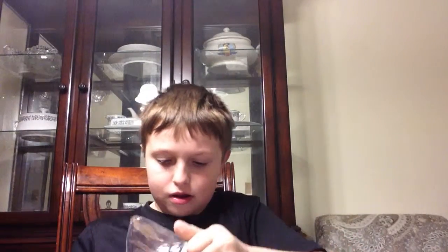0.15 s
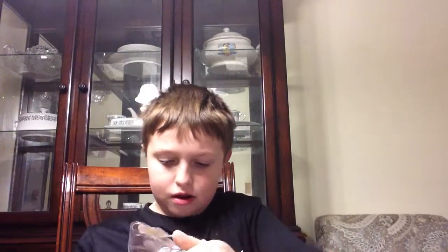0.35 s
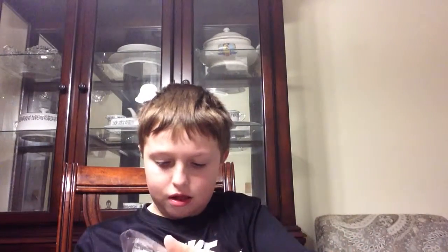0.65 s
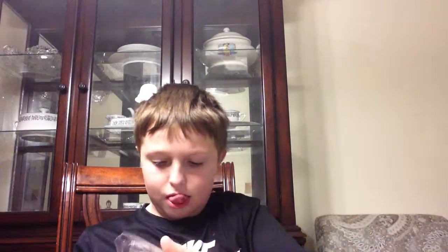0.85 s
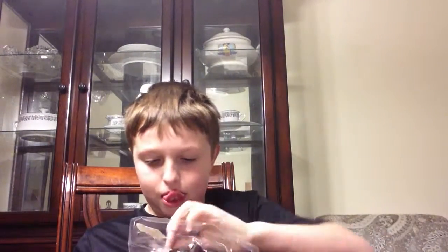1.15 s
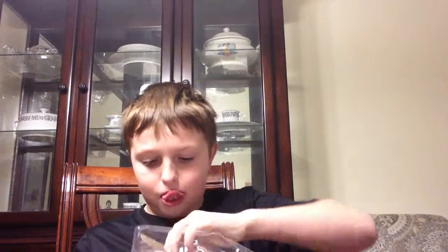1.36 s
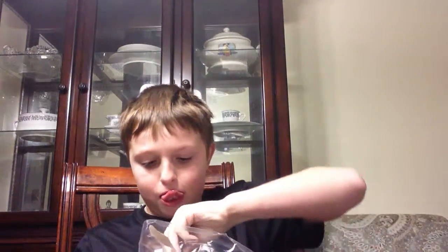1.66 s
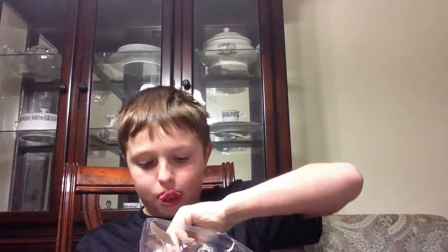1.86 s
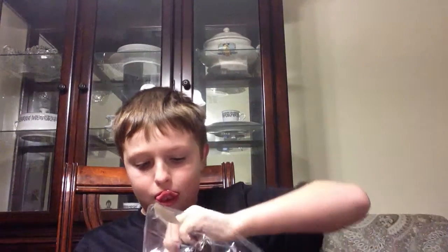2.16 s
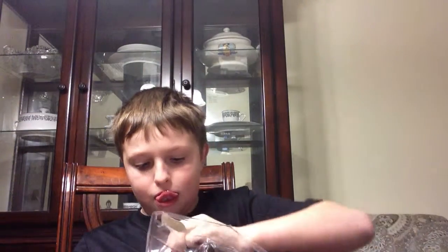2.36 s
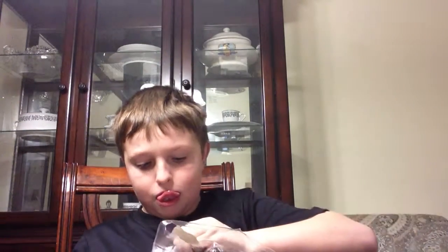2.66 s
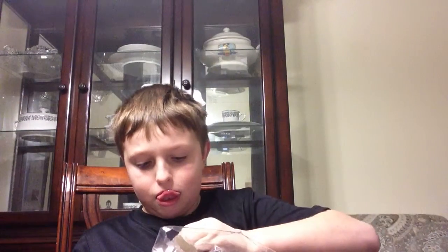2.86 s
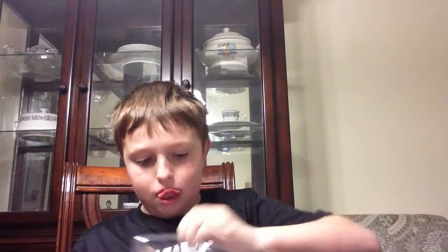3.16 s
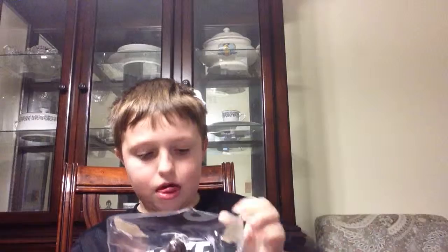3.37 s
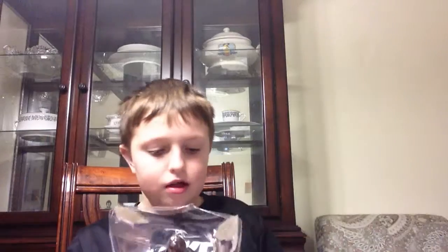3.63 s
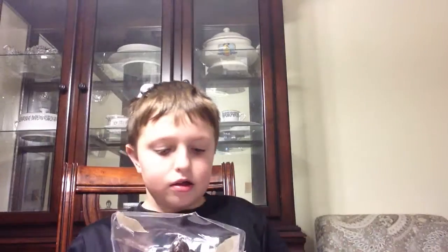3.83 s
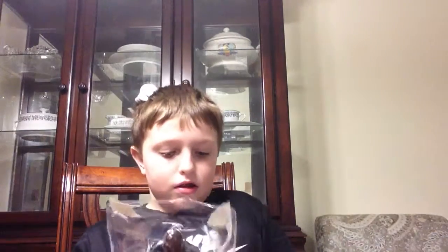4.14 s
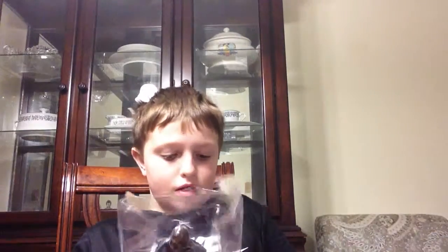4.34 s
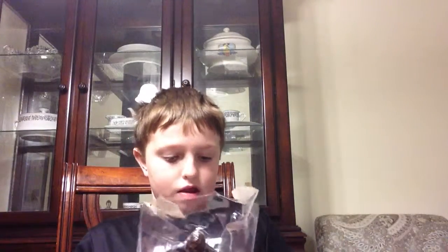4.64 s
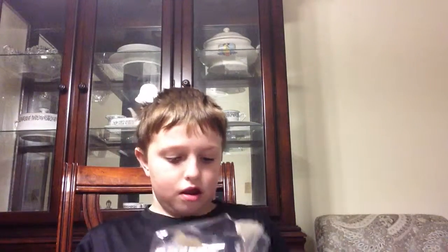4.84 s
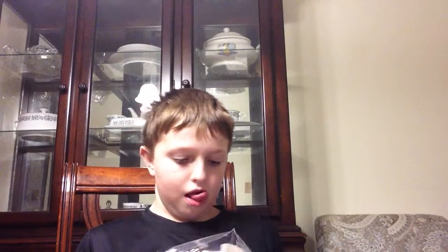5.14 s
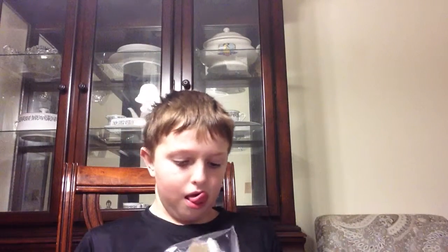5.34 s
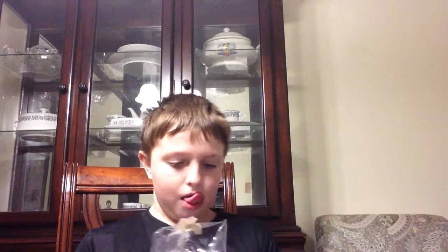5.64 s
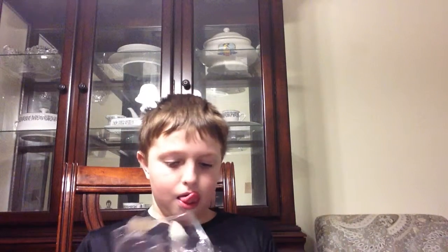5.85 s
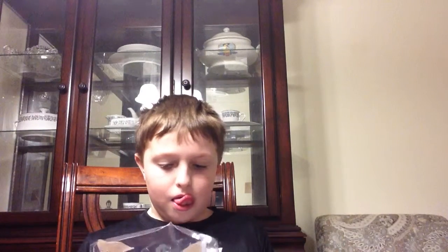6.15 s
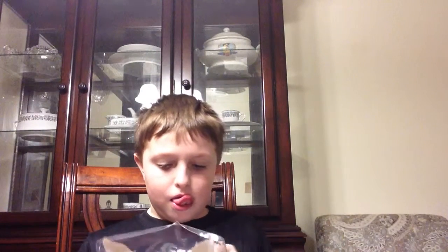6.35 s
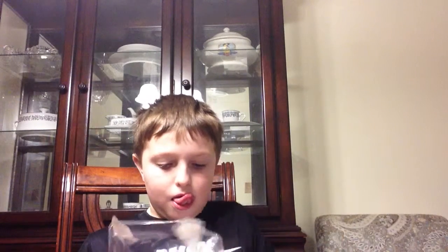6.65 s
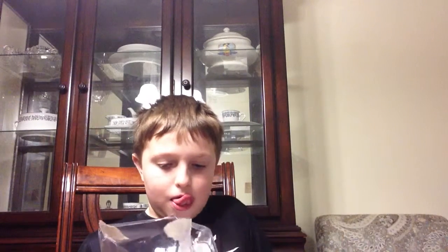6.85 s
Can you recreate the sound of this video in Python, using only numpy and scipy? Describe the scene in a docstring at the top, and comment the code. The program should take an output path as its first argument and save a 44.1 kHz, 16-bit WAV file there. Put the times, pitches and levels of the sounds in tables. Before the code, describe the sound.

Thin hard plastic packaging is worked by hand indoors. Low panel pops and bright creasing ticks cluster for a second and a half, then thin out to single clicks over soft room noise. A loud crackling burst follows, with rubbing and dull finger bumps, and stays busy. Near the end a deep pocket thumps hollowly, high squeaks slip by, and snaps continue. Close, thin-bassed pickup with short room reverberation.

```python
"""Hands work a toy figure out of a clear plastic blister tray, near a small microphone in a dining room, for 7 s.
Thin squeaks glide by under the first snaps: wide panels of the shell pop low, tight creases tick high.
From 1.5 s it is mostly faint, with single pops; a dense flurry of snaps opens at 4.26 s, loudest at 4.36 s.
Very high squeaks sound from 6.05 s, the deep pocket drums at 6.19 s, and snaps go on to the end. Crackle and
rubbing (shaped noise) follow the flexing, fingers bump the tray; room ring and steady noise lie beneath."""
import sys
import numpy as np
from scipy import signal
from scipy.fft import rfft, irfft
from scipy.io import wavfile
from scipy.ndimage import uniform_filter1d

SR = 44100
rng = np.random.default_rng(int(sys.argv[2]) if len(sys.argv) > 2 else 0)


def unload_audio(sound):
    """Save the sound as a 16-bit wav file, at the path given as the first command line argument."""
    columns = np.transpose(np.atleast_2d(sound))
    # keep every value between -1 and 1, then stretch to whole-number steps
    steps = np.round(np.clip(columns, -1, 1) * 32767)
    wavfile.write(sys.argv[1], SR, steps.astype(np.int16))


N = 308700

# buckles of the shell: (t/s, level/dB before the layer gain, panel pitch f/Hz,
# fall above that pitch/dB per octave, length/ms)
SHELL_SNAPS = [(.1,-37.5,810,1,3.2), (0.1158,-25.5,3240,3,1.3), (.163,-20.5,2420,7,3),
               (.227,-35.5,13100,11,1.2), (0.2778,-34,1420,-0.5,1.9), (0.3195,-33,1350,5,3.3),
               (.405,-26.5,566,2,5.2), (0.4163,-19.5,1110,3.5,2.1), (0.4491,-15.5,3720,6.5,3.3),
               (0.4687,-22.5,615,4.5,2.4), (0.487,-21.5,774,5.5,5.4), (.54,-24,630,1,5.5),
               (0.59,-23.5,1210,4,7.7), (0.6466,-24.5,1580,9,5), (0.708,-31.5,1110,5.5,6.6),
               (0.7384,-24.5,1700,0.5,3.4), (0.743,-21,4400,-1,4.5), (0.8477,-43,10000,-7.5,5),
               (0.9391,-30,1340,28,2.1), (0.9611,-30,1700,12,1.1), (0.974,-25,2640,19,3.2),
               (.9937,-22,2620,-4,3.3), (0.9989,-20.5,814,7.5,0.99), (1.0087,-24.5,1900,12,1.1),
               (1.0137,-27,1500,4,2.8), (1.041,-24,4050,6,3.7), (1.0664,-29,900,4,5.6),
               (1.185,-26,2900,11,3.3), (1.2381,-32,640,9,9.4), (1.3123,-46,10700,6,1.4),
               (1.3486,-28.5,2600,2.5,5.5), (1.3849,-16.5,1270,2,5.4), (1.557,-33,11200,6,2.6),
               (1.65,-52,10300,8,2), (1.7,-47.5,600,1,1.2), (1.827,-48,1020,9,2.9), (1.8556,-46,980,12,4.7),
               (1.8812,-43.5,730,7,4.1), (1.969,-31.5,2780,14.5,3), (2.006,-37.5,12500,3,2.7),
               (2.024,-48,13000,0,2.3), (2.046,-16.5,680,6,3.1), (2.046,-22,3500,13.5,4.7),
               (2.1935,-50,12000,3,1.6), (2.183,-39.5,1000,4,3.7), (2.2065,-33,600,5.5,5),
               (2.2298,-41.5,4500,-6,3), (2.332,-40.5,11500,6,3), (2.3735,-30.5,900,-1.5,3.1),
               (2.6946,-45,6000,-7,0.85), (2.74,-41.5,497,13,4.1), (2.8044,-34.5,6500,0,0.96),
               (2.832,-32,1500,-4,4.3), (3.0245,-19,864,10.5,11), (3.062,-31,4350,5.5,2.1),
               (3.1348,-42,13000,0,2), (3.1446,-40,9600,8,2), (3.16,-36.5,525,7,3.9),
               (3.19,-40,10800,5,1.9), (3.213,-34,656,1,5.8), (3.5476,-32,4000,-1,2.5),
               (3.5754,-33,13000,5,3.3), (3.587,-32,1000,-1,0.7), (3.6067,-36,700,4,9.1),
               (3.6305,-35.5,1200,6,1.2), (3.6895,-38.5,744,1,4.7), (3.8411,-29.5,730,8,3.9),
               (3.97,-39.5,1340,17,2.7), (4.0686,-44.5,700,-0.5,4.2), (4.1229,-30.5,690,7,6),
               (4.256,-44,2000,11,3), (4.2604,-17,2220,10.5,5.1), (4.3078,-25,640,5.5,2.1),
               (4.3553,-19.5,2900,12,8.6), (4.3611,-9.5,2070,4.5,6.3), (4.3866,-17.5,1450,15,2.3),
               (4.3972,-17.5,510,2,2.6), (4.4312,-20.5,1200,2.5,2.8), (4.4525,-19.5,2000,-.5,2.6),
               (4.4646,-21,795,0.5,2.4), (4.4736,-24,2080,0,1.9), (4.538,-20,1800,1,3.1),
               (4.5555,-20,1150,3.5,4), (4.6006,-21,736,0,4.2), (4.628,-17.5,2150,-1.5,6.4),
               (4.6332,-14,1130,2,1.8), (4.688,-23.5,900,5.5,4), (4.694,-27.5,11700,-3,0.91),
               (4.7233,-27,525,5,3.5), (4.759,-24,930,4,2.4), (4.812,-26,4000,10,3),
               (4.836,-30.5,1500,-1.5,4.3), (4.89,-29,1800,2,2.9), (4.9037,-26.5,1180,15,5.6),
               (4.9252,-27.5,3300,8,3.6), (4.9659,-14,1920,8,3.4), (5.047,-28.5,1080,13,3.2),
               (5.095,-27.5,1850,1.5,2.1), (5.11,-15,4000,0,4.9), (5.122,-15.5,2520,3,2.7),
               (5.2,-25.5,930,4.5,7.6), (5.2417,-26.5,1680,1.5,3.8), (5.2748,-20,9100,11,0.7),
               (5.314,-30,7550,13,7.1), (5.325,-27.5,1000,-3,4), (5.3754,-24.5,3440,11,.7),
               (5.407,-20,1340,5,5.1), (5.4159,-12,2460,6.5,4.2), (5.4612,-30,700,1,4.5),
               (5.6138,-20.5,1780,-1.5,2.5), (5.6495,-22.5,2020,0.5,1.6), (5.6817,-27.5,2500,4,1),
               (5.7607,-25,1550,6,9.6), (5.7803,-29,1050,7.5,2.1), (5.8219,-30,464,3.5,1.9),
               (5.841,-30.5,10000,-8,17), (5.8674,-24,940,0,4.2), (5.934,-22,905,-2.5,4.1),
               (5.989,-27,5500,-2,1.6), (5.9985,-32.5,1810,11,3.1), (6.0207,-20.5,2170,0,6),
               (6.04,-18.5,7100,5,6), (6.1374,-35.5,550,4,1.5), (6.1896,-10,625,4,1.3),
               (6.5068,-34.5,7500,1,3.3), (6.585,-24,2300,3.5,4.4), (6.621,-25.5,1500,6,2.7),
               (6.6435,-14,1780,8,4.9), (6.6689,-25,1200,-0.5,3), (6.6862,-16.5,2450,4,1.6),
               (6.7153,-25.5,1220,4,2.5), (6.8702,-30,2030,16,4.9), (6.8902,-14.5,2000,6.5,5.9),
               (6.9646,-21,3300,13,2.4), (6.974,-23,1270,2,2.2)]
# colour that the shell gives every snap: (f/Hz, level/dB)
SHELL_COLOUR = [(30, -24), (90, -53), (150, -7), (240, -3.5), (460, 2.5), (730, 5.5), (1100, 3),
                (2200, 0.5), (4500, -3), (9000, -4.5), (15000, -5)]
# colour of the fine crackle and rubbing, relative: (f/Hz, level/dB per Hz)
CRACKLE_COLOUR = [(60, -4), (160, 1.5), (350, 7.5), (800, -1), (1600, 4), (3000, -2), (6000, -10),
                  (10000, -12.5), (15000, -12)]
# hands squeeze or pull the tray: (start t/s, length/s, effort level/dB, extra treble level/dB)
HAND_SQUEEZES = [(0, .03, -34.5, 2), (0.083, .08, -36, 1), (0.275, 0.094, -43.5, 8), (.41, 0.16, -40.5, 6),
                 (.56, 0.26, -41.5, -3.5), (0.935, .12, -33, 6.5), (1.136, 0.064, -40.5, -17),
                 (1.349, 0.035, -38.5, 3), (1.78, .2, -57.5, -4), (2.692, 0.056, -60, 19.5),
                 (3.122, 0.044, -50.5, 7), (3.556, 0.051, -38, 8.5), (3.94, 0.22, -63, -2),
                 (4.354, 0.088, -37, -4), (4.628, 0.2, -33, 3), (4.89, 0.14, -42.5, -3),
                 (5.032, 0.073, -44.5, 11), (5.102, 0.25, -43, 15), (5.406, .12, -29.5, 1.5),
                 (5.599, 0.08, -39, 8), (5.751, 0.03, -30.5, 0), (5.851, 0.1, -46, 28),
                 (5.992, .07, -41, 17.5), (6.174, 0.15, -55, 4), (6.538, .08, -44, 9),
                 (6.637, 0.088, -24, -3), (6.885, 0.13, -32, 6.5)]
# plastic sticks and slips on plastic: (start t/s, length/s, pitch f/Hz, glide over the length/Hz, start level/dB)
STICK_SLIPS = [(0.029, 0.087, 958, -30, -44), (.29, 0.38, 533, -31.5, -50), (.6, 0.23, 907, -125, -40),
               (6.055, 0.098, 8920, 50, -35.5), (6.517, 0.17, 8770, -96, -36),
               (6.605, 0.042, 9300, 50, -33)]
# fingers bump the whole tray: (t/s, level/dB before doubling, pitch f/Hz)
FINGER_BUMPS = [(1.047, -34.5, 284), (2.212, -39, 304), (2.74, -40.5, 234), (3.033, -35, 258),
                (4.259, -28, 257), (4.368, -23.5, 245), (5.823, -28, 332), (6.202, -31, 342)]
# colour of the drumming pocket, relative: (f/Hz, level/dB per Hz)
POCKET_COLOUR = [(100, -50), (220, -16.5), (320, 1), (480, -0.5), (700, 3.5), (790, -4.5), (950, -36),
                 (3000, -42), (15000, -70)]
# lingering tones of the hollow tray, relative: (f/Hz, level/dB, t60/s)
HOLLOW_TONES = [(364, 3.5, .24), (521, 1, .3), (688, -5, .25), (1264, -7, .3), (1388, -13, .2)]
# room decay: (f/Hz, t60/s)
ROOM_DECAY = [(200, 0.59), (530, 0.44), (1400, 0.45), (3700, 0.44), (9700, 0.38), (15000, 0.23)]
# colour of the steady room noise, relative: (f/Hz, level/dB per Hz)
AIR_COLOUR = [(25, 22), (60, -27), (105, -6), (140, -2.5), (180, 1), (240, 1), (380, 1), (700, -4.5),
              (2400, -18.5), (8000, -20.5), (15000, -24)]

EDGE_HZ = 15550  # top of the audible band, for the snaps and the microphone
TAPS = 2048  # samples in one snap or bump
BINS = np.fft.rfftfreq(TAPS, 1 / SR)  # Hz
FOLD_HZ = np.geomspace(800, 16000, 22)  # where the resonances of a fold may lie
# a panel radiates poorly below its pitch, the more so the steeper its top falls
BASS_DB_PER_OCTAVE, NARROWING = 6.5, 0.1
# a squeeze builds, then dies away; merely holding the tray rustles a little
GRIP_S, RELAX_S, HOLD_DB = 0.005, 0.025, -61
TREBLE_HZ = 4000  # split between body and treble of the crackle
SQUEAK_RISE_S, SQUEAK_FADE_DB = 0.025, -10.5
POCKET_S, POCKET_DB, POCKET_RISE_S, POCKET_T60_S = 6.19, -21.5, 0.04, 0.57
AIR_DB = -50.5


def snaps(direct_db=1.68, peak_db=3.5, lag_s=0.0015):
    """Distinct buckles: a jagged burst to the microphone, and the sound sent in all other directions."""
    direct, scattered = np.zeros((2, N))
    for s, db, pitch_hz, fall, length_ms in SHELL_SNAPS:
        waves = burst(length_ms, ripple_db=3.0)
        below = BASS_DB_PER_OCTAVE + NARROWING * fall
        towards_mic = snap(pitch_hz, below, fall, waves, peak_db)
        add(direct, s, amp(db + direct_db) * towards_mic)
        # over all directions the ripples of the spectrum average out
        all_round = snap(pitch_hz, below, fall, 1, peak_db=0)
        add(scattered, s + lag_s, amp(db) * all_round)
    return direct, scattered


def snap(pitch_hz, below, above, waves, peak_db=5, peak_octaves=0.25):
    """Colours bending waves by the panel that buckles; slopes in dB/octave, energy that of rms 1 over 5 ms."""
    octaves = np.log2(np.maximum(BINS, 100) / pitch_hz)
    panel_db = below * np.minimum(octaves, 0) - above * np.maximum(octaves, 0)
    panel_db += peak_db * np.exp(-(octaves / peak_octaves) ** 2)
    top_cut = 1 + (BINS / EDGE_HZ) ** 30
    gain = amp(panel_db + read(SHELL_COLOUR, BINS)) / top_cut
    wave = irfft(waves * causal(gain))
    return wave * np.sqrt(0.005 * SR / np.sum(wave ** 2))


def burst(length_ms, rise_ms=0.065, linger_db=-21, linger_ms=25.0, grit=0.49, ripple_db=5.0):
    """Spectrum of one buckle: bending waves cross the panel for a few ms; flat overall, jagged in detail."""
    ms = np.arange(TAPS) * 1000 / SR
    past = np.maximum(ms - length_ms, 0)
    body = np.exp(-(ms / length_ms) ** 3)
    linger = amp(linger_db) * np.exp(-past / linger_ms)
    shape = (1 - np.exp(-ms / rise_ms)) * (body + linger)
    gritty = rng.standard_normal(TAPS) * np.exp(grit * rng.standard_normal(TAPS))
    z = rfft(shape * gritty)
    # a running mean of the power, wider towards the treble, levels the broad slope
    k = np.arange(len(z))
    reach = 9 + k // 2
    lo, hi = np.maximum(k - reach, 0), np.minimum(k + reach, len(z))
    total = np.r_[0, np.cumsum(abs(z) ** 2)]
    mean_power = (total[hi] - total[lo]) / (hi - lo)
    # every fold has its own few broad resonances
    ripple = np.interp(BINS, FOLD_HZ, rng.standard_normal(len(FOLD_HZ)))
    return z / np.sqrt(mean_power) * causal(amp(ripple_db * ripple))


def crackle(crackle_db=-3.5, rub_db=-11, per_s=120, spread_db=5.0, count=24):
    """Tiny creases give way at random and fingers slide, both as strongly as the tray is flexed."""
    happens = rng.random(N) < per_s / SR
    sizes = amp(spread_db * np.minimum(rng.exponential(1, N), 3)) * happens
    crease = rng.integers(0, count, N)
    ticks = np.zeros(N)
    for k, pitch_hz in enumerate(np.geomspace(600, 13000, count)):
        waves = burst(rng.uniform(3.3, 5.1))
        tick = snap(pitch_hz, 3.7, 2.67, waves) * np.sqrt(pitch_hz)
        ticks += signal.oaconvolve(sizes * (crease == k), tick)[:N]
    rub = amp(rub_db) * tint(rng.standard_normal(N), CRACKLE_COLOUR)
    grain = amp(crackle_db) * tint(ticks, CRACKLE_COLOUR) + rub
    low = signal.sosfiltfilt(signal.butter(2, TREBLE_HZ, fs=SR, output="sos"), grain)
    body, treble = flexing()
    return body * low + treble * (grain - low)


def flexing():
    """How hard the tray is worked, for body and treble: each squeeze builds, holds and relaxes."""
    t = np.arange(N) / SR
    body, treble = np.full((2, N), amp(HOLD_DB))
    for s, length, db, treble_db in HAND_SQUEEZES:
        build = np.clip((t - s) / GRIP_S, 0, 1)
        relax = np.exp(-np.maximum(t - s - length, 0) / RELAX_S)
        effort = amp(db) * build * relax
        body = body + effort
        treble = treble + effort * amp(treble_db)
    return body, treble


def squeaks(waver=0.0038, octave_db=-12, flutter_db=3.0):
    """Stick-slip whistles, thin and unsteady, with a weak octave: each swells, glides and fades."""
    out = np.zeros(N)
    for s, length, hz, glide_hz, db in STICK_SLIPS:
        t = np.arange(0, length, 1 / SR)
        drift = unit(uniform_filter1d(rng.standard_normal(N), size=60))[:len(t)]
        pitch = (hz + glide_hz * t / length) * (1 + waver * drift)
        phase = 2 * np.pi * np.cumsum(pitch) / SR
        tone = np.sin(phase) + amp(octave_db) * np.sin(2 * phase)
        tone = tone * signal.windows.tukey(len(t), 0.1)
        grip = unit(uniform_filter1d(rng.standard_normal(N), size=700))[:len(t)]
        swell = np.minimum(t / SQUEAK_RISE_S, 1) * amp(db + SQUEAK_FADE_DB * t / length)
        add(out, s, swell * unit(tone * amp(flutter_db * grip)))
    return out


def bumps(decay_s=0.0068):
    """Soft blows: a few cycles of the whole tray swinging in the hand."""
    out, t = np.zeros(N), np.arange(TAPS) / SR
    for s, db, hz in FINGER_BUMPS:
        envelope = (1 - np.exp(-t * hz * 2)) * np.exp(-t / decay_s)
        add(out, s, 2 * amp(db) * envelope * np.sin(2 * np.pi * hz * t))
    return out


def pocket():
    """The deep pocket pops out and drums on: coloured noise as many close low modes that swell and die together."""
    t = np.maximum(np.arange(N) / SR - POCKET_S, 0)
    rise = np.minimum(t / POCKET_RISE_S, 1)  # zero until the pop
    decay = amp(POCKET_DB - 60 * t / POCKET_T60_S)
    return rise * decay * tint(rng.standard_normal(N), POCKET_COLOUR)


def hollow(x, ring_db=-57):
    """The hollow tray keeps ringing faintly at a few low tones."""
    t = np.arange(SR // 2) / SR
    ring = np.zeros(len(t))
    for hz, db, t60 in HOLLOW_TONES:
        ring += amp(db - 60 * t / t60) * np.sin(2 * np.pi * hz * t)
    return amp(ring_db) * signal.oaconvolve(x, ring)[:N]


def room(x, tail_db=-6.0, gap_s=0.0068, tilt_db=0.26, early_db=3, early_s=0.013, count=7):
    """Dense early reflections and a diffuse tail; both change as the tray moves about."""
    out = np.zeros(N)
    for k in range(count):
        taps = rng.standard_normal(SR // 2) * (rng.random(SR // 2) < 0.15)  # sparse reflections
        hz, t, z = signal.stft(taps, SR, nperseg=256)
        decay_db = -60 * t / read(ROOM_DECAY, hz)[:, None]
        decay_db = decay_db + early_db * np.exp(-t / early_s)
        decay_db = decay_db + tilt_db * np.log2(hz[:, None] + 100)
        tail = signal.istft(z * amp(decay_db), SR)[1]
        tail = tail / np.linalg.norm(tail)
        place = (9 * np.arange(N) / SR + k) % count  # nine places a second, in rotation
        share = np.sin(np.pi / 2 * np.minimum(place, 2))  # neighbours cross-fade at constant power
        add(out, gap_s, amp(tail_db) * signal.oaconvolve(x * share, tail))
    return out


def air():
    """The steady noise of the house: coloured noise at constant level."""
    return amp(AIR_DB) * tint(rng.standard_normal(N), AIR_COLOUR)


def amp(db):
    """Decibels to gain."""
    return 10 ** (np.asarray(db) / 20)


def unit(x):
    """Scales to an rms of 1."""
    return x / np.sqrt(np.mean(x ** 2) + 1e-20)


def read(points, hz):
    """Reads a table over frequency on a log-frequency axis."""
    f, value = np.transpose(points)
    return np.interp(np.log(hz + 1), np.log(f), value)


def add(mix, s, sound):
    """Mixes a sound in at time s."""
    part = mix[max(round(s * SR), 0):][:len(sound)]
    part += sound[:len(part)]


def tint(x, points):
    """Filters a long signal by the colour of a table and sets it to rms 1."""
    gain = amp(read(points, np.fft.rfftfreq(N, 1 / SR)))
    return unit(irfft(rfft(x) * gain, N))


def causal(gain):
    """Minimum-phase response with this gain: nothing sounds before the blow."""
    log_gain = np.log(np.maximum(gain, gain.max() * 1e-5))
    circle = np.r_[log_gain, log_gain[-2:0:-1]]
    return np.exp(np.conj(signal.hilbert(circle)))[:len(gain)]


def scene():
    """The tray, its room and the steady noise of the house."""
    direct, scattered = snaps()
    small = crackle() + squeaks() + bumps()
    scattered = scattered + small
    reverb = room(scattered + hollow(scattered))
    return (direct + small + pocket() + reverb + air())[None]


def record(dry, ceiling=0.56, bass_hz=150, lopsided=0.03):
    """A small microphone: thin bass, loud snaps rounded at its ceiling, a faint low push from the steepest edges."""
    thin = signal.sosfilt(signal.butter(3, bass_hz, "high", fs=SR, output="sos"), dry)
    rounded = thin / (1 + (thin / ceiling) ** 6) ** (1 / 6)
    rounded = rounded + lopsided * np.diff(rounded, prepend=0) ** 2
    top_cut = signal.firwin(255, EDGE_HZ, window=("kaiser", 8), fs=SR)
    return signal.oaconvolve(rounded, top_cut[None], "same")


dry = scene()
out = record(dry)
unload_audio(out)
```